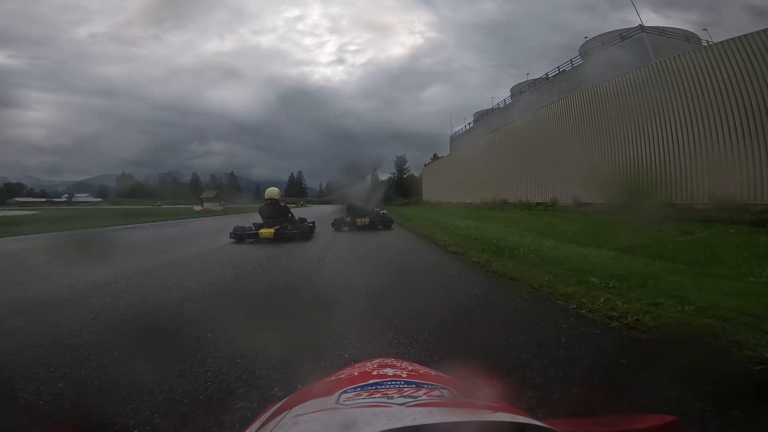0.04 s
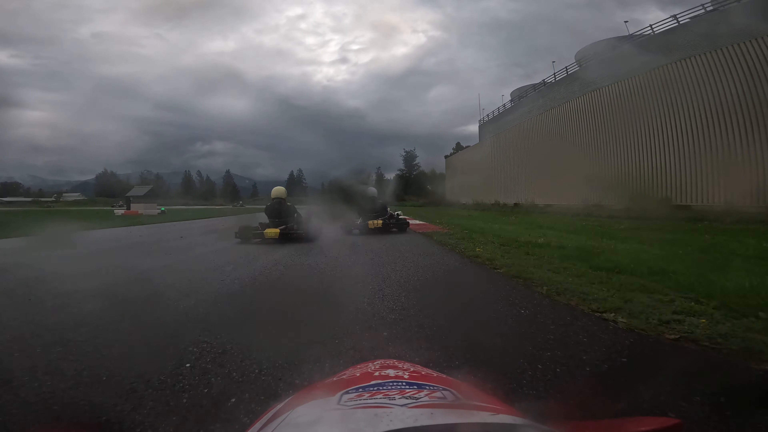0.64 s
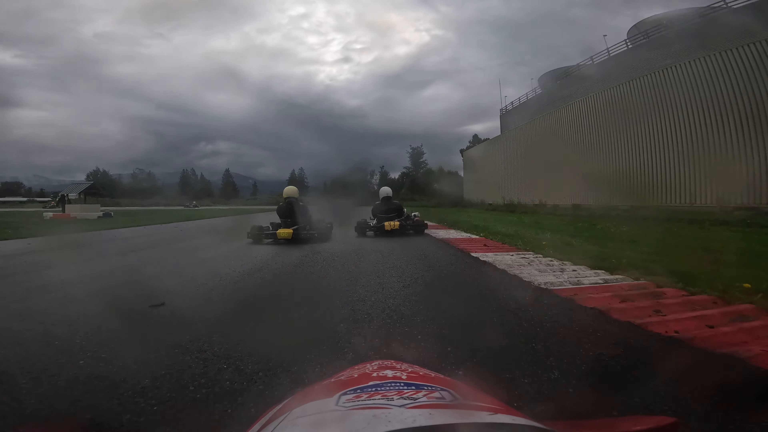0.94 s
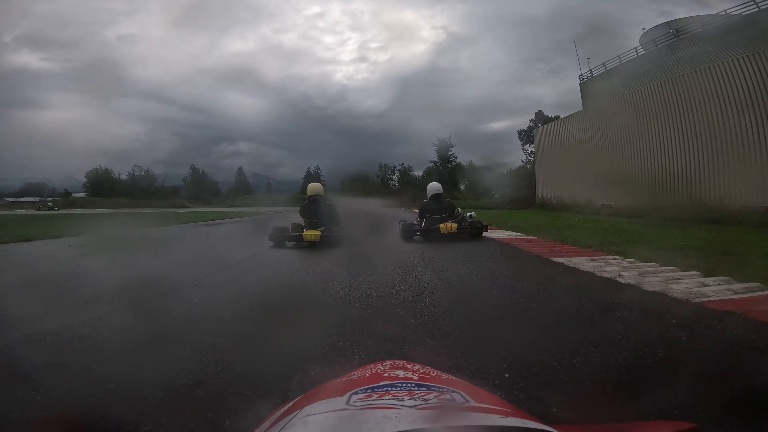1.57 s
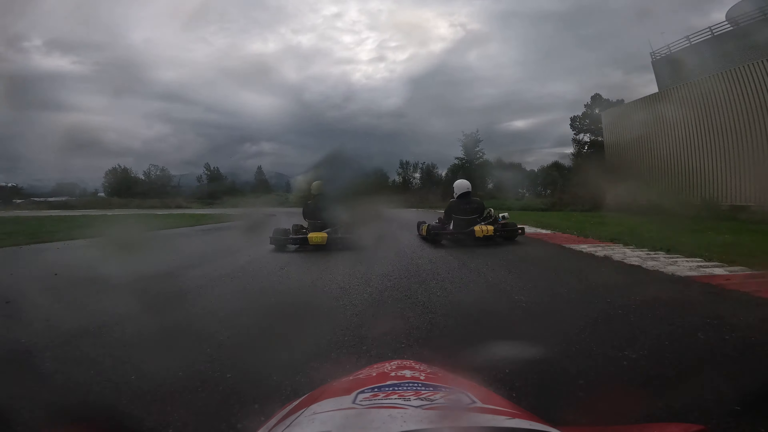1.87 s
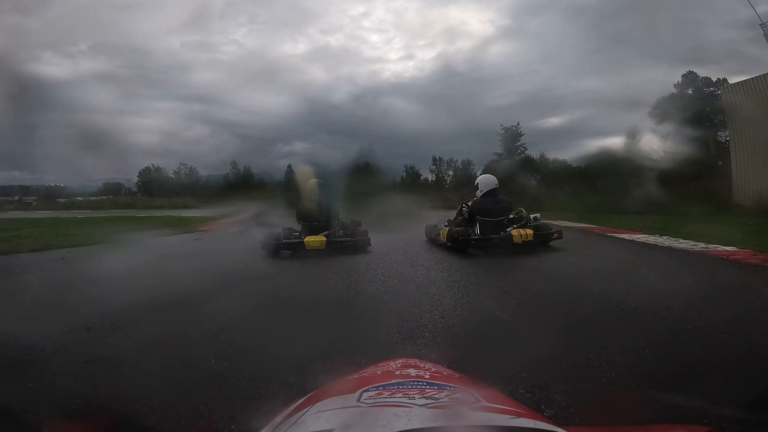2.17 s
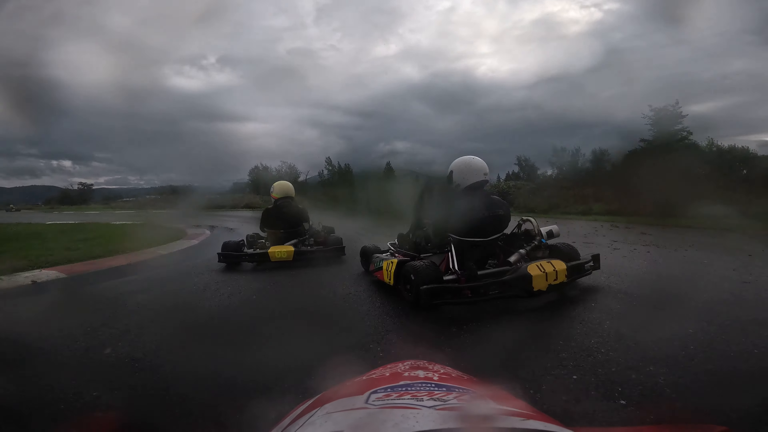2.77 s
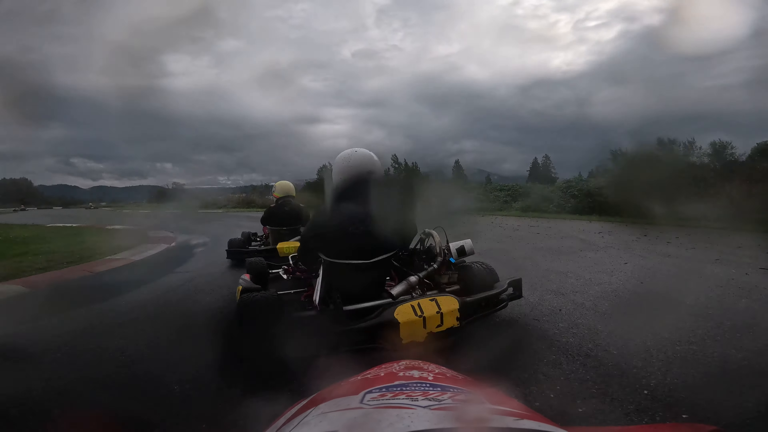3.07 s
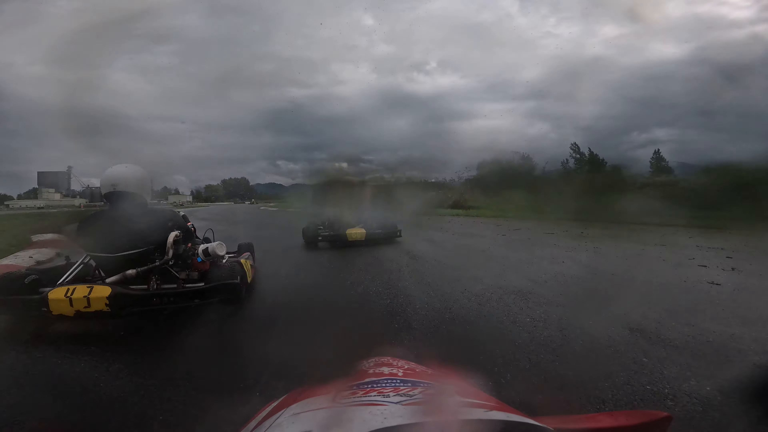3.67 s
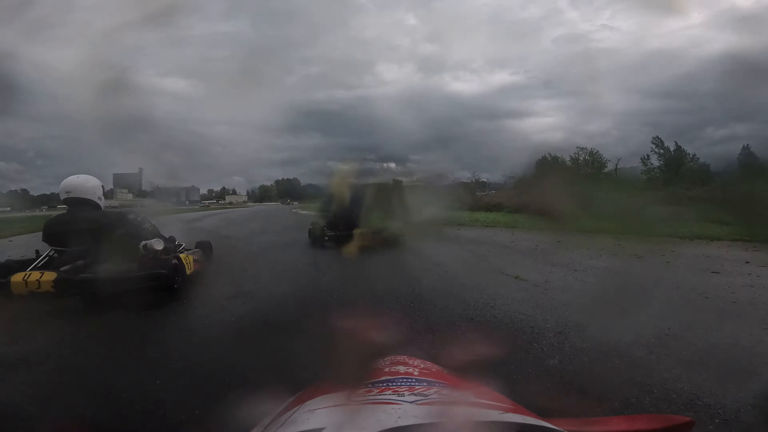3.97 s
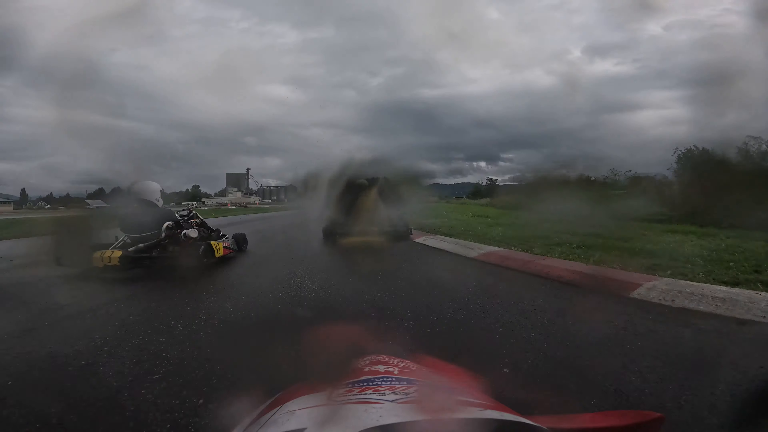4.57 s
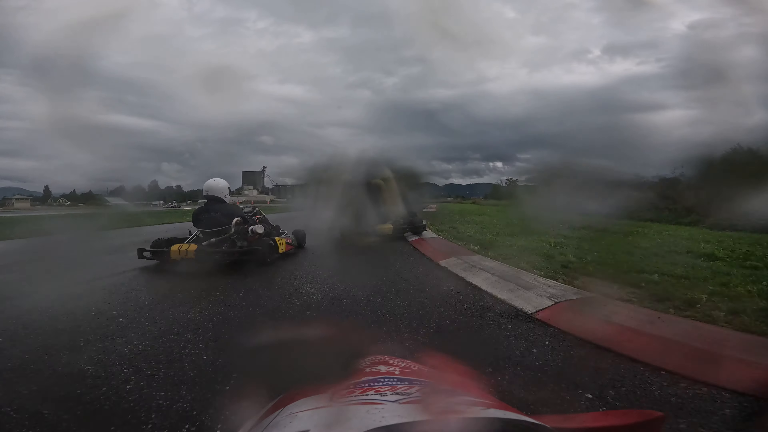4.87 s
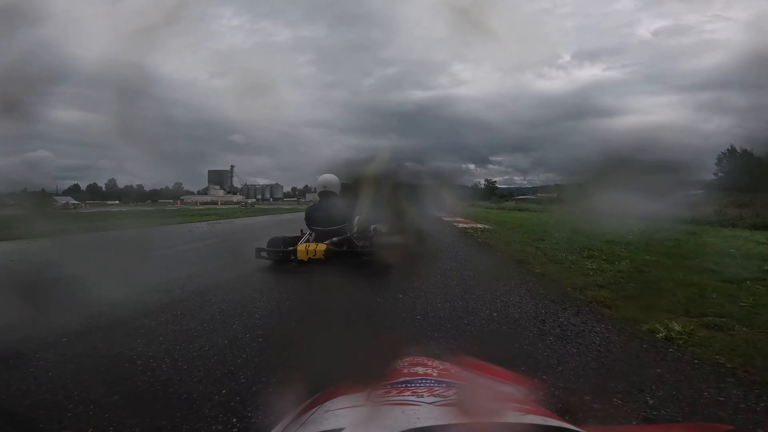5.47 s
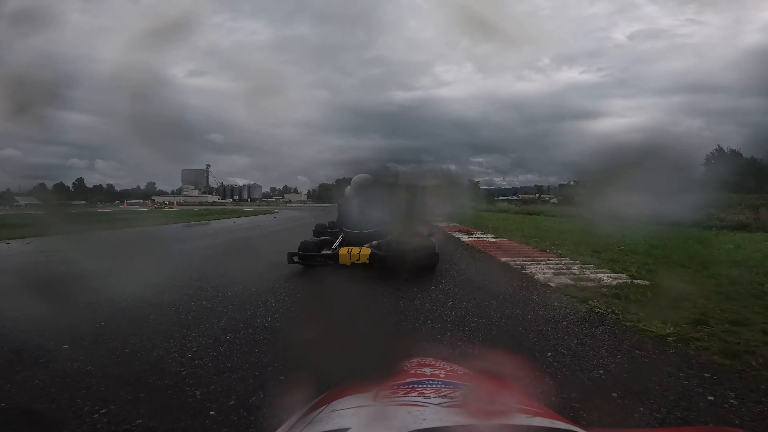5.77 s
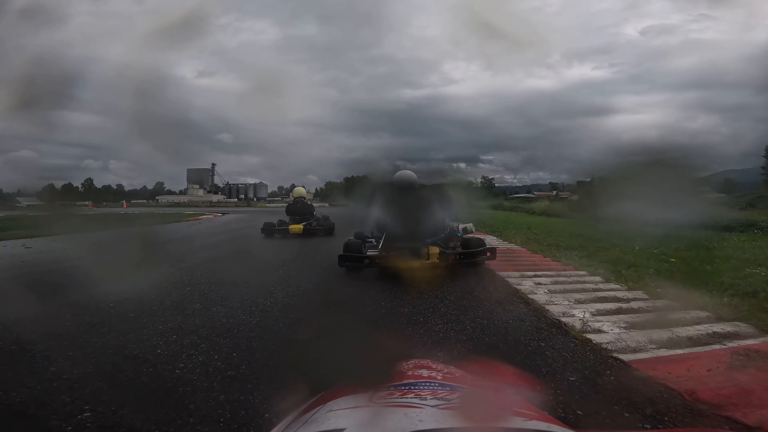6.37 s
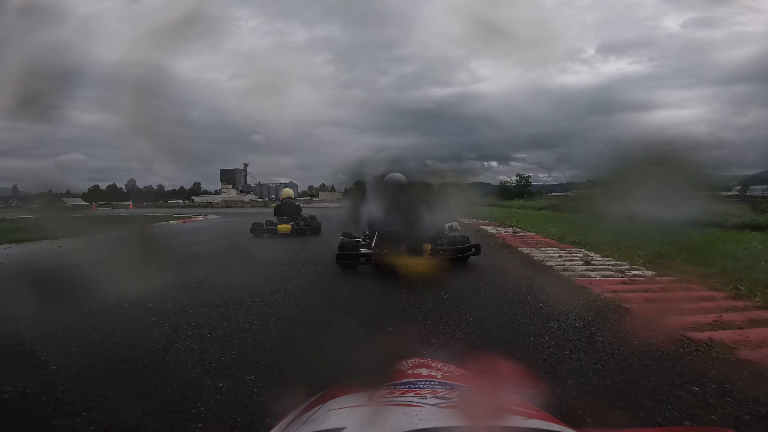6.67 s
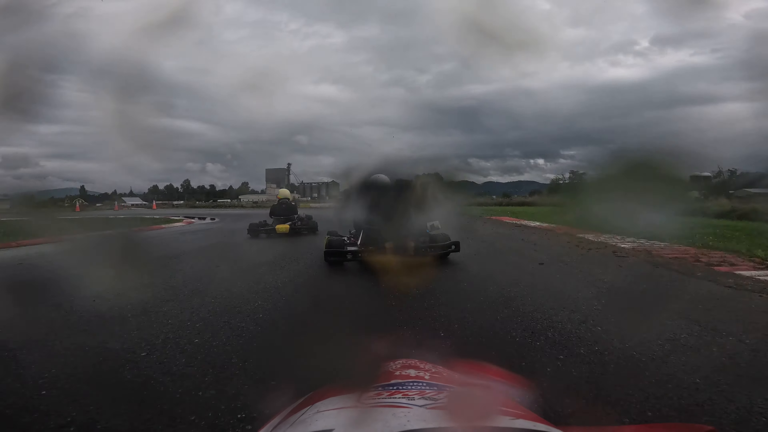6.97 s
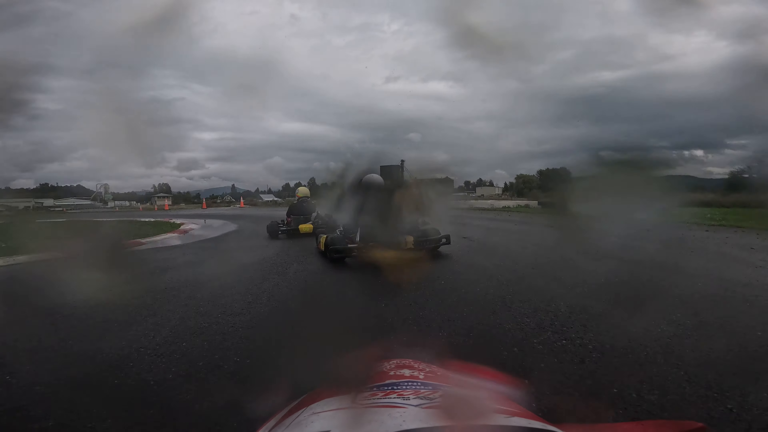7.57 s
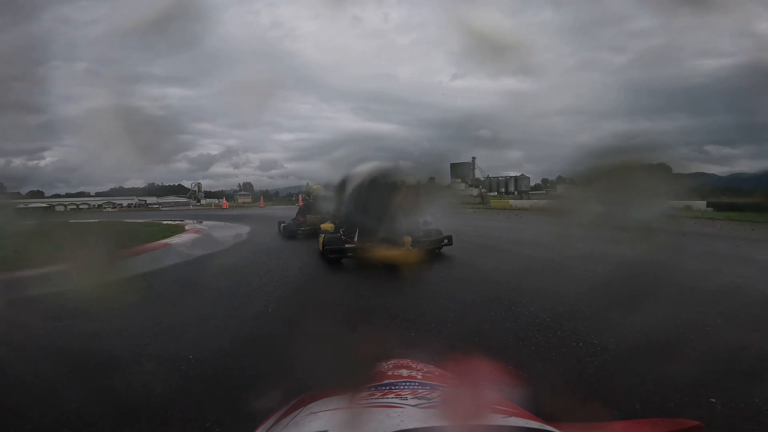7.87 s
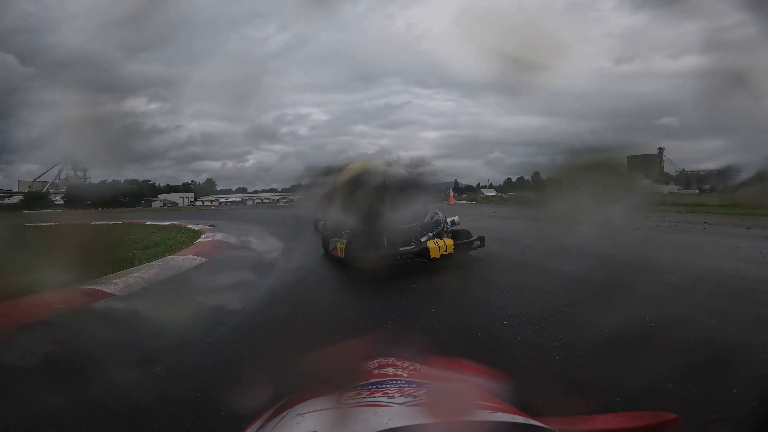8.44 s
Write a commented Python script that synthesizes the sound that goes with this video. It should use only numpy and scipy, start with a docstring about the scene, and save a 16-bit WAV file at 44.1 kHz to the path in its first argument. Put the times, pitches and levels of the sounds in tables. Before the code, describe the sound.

A single-cylinder kart engine drones loudly, heard from a microphone on the kart's own bodywork on a wet track. It starts at high revs with panels chattering, then sinks to a lower hum and growl for a corner, where another kart putters faintly. It pulls again with rapid plastic knocking, lifts off abruptly, slows, and picks up with more rattling near the end. Deep air rumble runs underneath.

```python
"""A single-cylinder four-stroke kart engine on a wet track, heard from a camera on the kart's bodywork.
Harmonics of the firing rate force the frame into a drone; under load each firing makes the panels
chatter, and off the throttle the crank orders hum. Loose panels knock and the chassis modes growl.
Air rumbles, the wheels thump and scrub in corners, spray hisses, a few drops strike the housing,
and the exhaust of the kart ahead putters whenever it comes close."""
import sys
import numpy as np
from scipy import signal
from scipy.fft import rfft, irfft, next_fast_len
from scipy.io import wavfile
from scipy.ndimage import uniform_filter1d, minimum_filter1d

SR = 44100
rng = np.random.default_rng(int(sys.argv[2]) if len(sys.argv) > 2 else 0)


def bounce(signal):
    """Save signal as a 16-bit WAV file at the path given by the first command-line argument."""
    frames = np.transpose(np.atleast_2d(signal))
    limited = np.clip(frames, -1, 1)
    pcm = np.round(limited * 32767).astype(np.int16)
    wavfile.write(sys.argv[1], SR, pcm)


N = 433944
T = np.arange(N) / SR

# engine speed: time_s, firing_hz
ENGINE_SPEED = [(0.0, 49.99), (0.45, 51.419), (0.96, 48.349), (2.06, 39.546), (2.79, 31.63), (3.11, 30.775),
                (3.7, 31.974), (4.05, 31.178), (4.46, 32.907), (4.77, 33.049), (4.82, 33.845),
                (5.99, 37.382), (6.01, 37.467), (7.28, 32.668), (8.51, 28.854), (8.76, 29.695),
                (9.26, 29.405), (9.84, 30.968)]


def drone(cycles, firing_hz, throttle):
    """Forced vibration: each harmonic of the firing rate swells as it crosses a frame resonance."""
    # harmonics: order, coasting_db, part_throttle_db, full_throttle_db
    orders = [(1, -41.5, -26, -16.5), (2, -11.5, -27.5, -40.5), (3, -48, -33.5, -28.5),
              (4, -20.5, -17.5, -31), (5, -47, -23, -26.5), (6, -24, -35.5, -42.5), (8, -29.5, -36.5, -41)]
    # response of the frame: frequency_hz, gain_db
    frame = [(30, 5), (50, 14.5), (60, 3), (72, -11), (85, 8.5), (102, 0), (125, 2), (150, 2), (165, -8.5),
             (190, 0), (222, -31.5), (262, -22.5), (294, 0), (420, -10.5)]
    # swell of the two main crank orders: time_s, second_order_db, fourth_order_db
    hum = [(.45, -6, 0), (.7, 2.5, -5), (1.051, 3.5, -4.5), (1.35, 2, 2.5), (1.75, -0.5, -9), (2.1, 3, 5),
           (2.5, 4.5, 0.5), (3.2, -1.5, 1.5), (4.502, 5.5, 1), (4.849, -6, 2.5), (5.75, 7, 3.5),
           (6.179, -15, -8), (6.45, 3, 2), (7.601, -2, 0.5), (8.3, 2.5, -6.5), (9.84, 2.5, -7)]
    frame_hz, frame_db = np.transpose(frame)
    hum_db = dict(zip((2, 4), curves(hum)))
    out = 0
    for order, *levels_db in orders:
        k = round(order)
        drive_db = np.interp(throttle, [0, .64, 1], levels_db) + hum_db.get(k, 0)
        response_db = np.interp(np.log(k * firing_hz), np.log(frame_hz), frame_db)
        bumps_db = 1.2 * walk(14)
        dispersion = np.pi * (k - 1) ** 2 / 5 + .7 * k  # bending waves give each order its own lag
        phase = 2 * np.pi * k * cycles - dispersion + .03 * k * walk(12)
        out += undb(drive_db + response_db + bumps_db) * np.cos(phase)
    return np.sqrt(2) * out


def mechanism(cycles, share):
    """Cyclic noise of valve gear, chain and gas: a share of the power repeats each engine cycle."""
    pattern = unit(irfft(np.exp(2j * np.pi * rng.random(513))))
    cyclic = np.interp(cycles % 1, np.linspace(0, 1, len(pattern)), pattern)
    return np.sqrt(share) * cyclic + np.sqrt(1 - share) * rng.standard_normal(N)


def crank_pulses(cycles, width_turns, scatter_db, idle_db):
    """Four-stroke excitation: one uneven pulse per crank turn, weaker on the turn that does not fire."""
    crank = 2 * cycles
    turn = np.maximum(np.round(crank).astype(int), 0)
    size = undb(scatter_db * rng.uniform(-1, 1, 2048)[turn] + idle_db * (turn % 2))
    return size * np.exp(-np.abs(crank - turn) / width_turns)


def firing_bursts(cycles, firing_hz, throttle):
    """Modulation envelope: pulses grow with load, and at high revs the panels no longer settle."""
    rattle = np.clip((firing_hz - 43.3) / 25.2, 0, 1)
    load = np.clip((throttle - .36) / .54, rattle, 1)
    pulses = crank_pulses(cycles, width_turns=.19, scatter_db=4.5, idle_db=-14.5)
    return load * ((1 - rattle) * pulses + rattle / 2)


def engine_noise(cycles, bursts, throttle):
    """Amplitude modulation: the firings pulse a low boom and a midrange clatter of machine noise."""
    # spectrum of the boom: frequency_hz, level_db
    boom_spectrum = [(130, -38), (205, -5.5), (245, -3.5), (295, 1.5), (400, -2), (490, -10.5), (620, -17),
                     (3000, -88.5)]
    # spectrum of the clatter: frequency_hz, level_db
    clatter_spectrum = [(250, -26), (470, 3.5), (640, -1), (820, 2), (910, 4.5), (985, 3), (1060, -4),
                        (1170, -0.5), (1320, -17.5), (1800, -14.5), (2300, -32.5), (8000, -79.5)]
    boom = unit(colour(mechanism(cycles, share=.14) * (1 + 2.1 * bursts), boom_spectrum))
    boom *= ride(throttle, base_db=-25, per_shake=1.72, db_per_hz=.4732, full_db=-1.5, corner_db=3.5)
    clatter = unit(colour(mechanism(cycles, share=.18) * (1 + 3.97 * bursts), clatter_spectrum))
    clatter *= ride(throttle, base_db=-29, per_shake=1.28, db_per_hz=.4127, full_db=-1.6, corner_db=1)
    return boom + clatter


def intake(throttle):
    """Resonance of the intake: a band of noise that roars at high revs."""
    gain = ride(throttle, base_db=-45, per_shake=2.4, db_per_hz=1.19, full_db=.5, corner_db=-5)
    return gain * noise_band(hz=552, width_hz=260)


def chassis_growl(cycles, firing_hz):
    """Modal response: crank turns ring the chassis, beside a wavering 11th order, clearer at speed."""
    # chassis modes: frequency_hz, width_hz, gain_db
    modes = [(280, 35, 8.5), (362, 44, -7), (985, 46, 2), (1730, 220, -26)]
    # strength of the growl: time_s, level_db
    strength = [(1.9, -54), (2.15, -34), (2.6, -35), (3.17, -28), (3.6, -42.5), (6.6, -55), (7.05, -35.5),
                (7.4, -37.5), (7.7, -32.5), (8.35, -28.5), (8.9, -31.5), (9.84, -34.5)]
    judder = mechanism(cycles, share=.27)
    judder *= .5 + 1.7 * crank_pulses(cycles, width_turns=.35, scatter_db=8, idle_db=-5.5)
    ringing = signal.sosfilt(signal.butter(6, 2200, fs=SR, output="sos"), ring(judder, modes))
    tone_db = 5 + .42 * (firing_hz - firing_hz.mean()) + 3 * walk(20)
    tone = undb(tone_db) * np.cos(2 * np.pi * 11 * cycles + .7 * walk(18))
    return undb(curves(strength)[0]) * (unit(ringing) + tone)


def bodywork(force, knocked):
    """Modal superposition: neighbouring modes swing opposite ways and the plastic absorbs the treble."""
    # panel modes: frequency_hz, width_hz, knocked_db, buzzing_db
    modes = [(550, 780, 9, -8.5), (787, 280, 17.5, 8.5), (920, 200, 11.5, 2), (1160, 66, 9, 6.5),
             (1404, 91, 10, 8), (1746, 336, 2.5, 5), (2110, 180, -7, -8)]
    out = 0
    for k, (hz, width_hz, knocked_db, buzzing_db) in enumerate(modes):
        out += (-1) ** k * ring(force, [(hz, width_hz, knocked_db if knocked else buzzing_db)])
    return signal.sosfilt(signal.butter(2, 2600, fs=SR, output="sos"), out)


def panel_buzz(cycles, bursts):
    """Forced rattling: bursts of machine noise drive the modes of the loose bodywork."""
    # how freely the panels buzz: time_s, level_db
    looseness = [(0, -34), (.75, -36), (1.15, -38), (1.6, -29), (1.95, -38.5), (3.4, -45.5), (3.5, -41),
                 (4.1, -39.5), (5.5, -35.5), (6.15, -35.5), (6.21, -41.5), (8.4, -51.5), (8.8, -33.5),
                 (9.84, -41)]
    force = mechanism(cycles, share=.071) * (1 + 7.7 * bursts)
    return undb(curves(looseness)[0]) * unit(bodywork(force, knocked=False))


def panel_knocks(squeak_hz, clack_hz):
    """Friction and impact: a panel squeaks on its mount, cracks loose, lands with a crack and a clack."""
    # knocks against the mounts: time_s, landing_db, sliding_db
    knocks = [(0.013, -14.5, -18.5), (0.054, -17.0, -16.5), (0.093, -18.0, -24.0), (0.182, -15.0, -23.0),
              (0.222, -13.0, -21.0), (0.32, -13.0, -23.5), (0.456, -14.0, -16.5), (0.495, -13.5, -20.0),
              (0.573, -17.5, -23.0), (0.613, -15.0, -31.0), (0.714, -12.0, -18.5), (0.734, -13.0, -25.0),
              (0.837, -15.5, -25.0), (1.388, -16.0, -24.5), (1.556, -14.0, -25.0), (1.591, -13.0, -24.0),
              (1.638, -12.5, -17.5), (1.675, -13.5, -25.0), (1.803, -14.0, -26.5), (3.48, -17.5, -17.0),
              (3.514, -9.5, -13.0), (3.547, -11.5, -17.0), (3.607, -15.0, -22.0), (3.641, -12.5, -12.5),
              (3.672, -13.0, -25.0), (3.704, -8.5, -25.5), (3.734, -12.5, -21.5), (3.797, -11.0, -18.5),
              (3.83, -12.0, -24.0), (3.923, -14.0, -22.5), (3.953, -9.0, -14.0), (3.987, -10.5, -23.0),
              (4.018, -10.0, -15.0), (4.052, -9.5, -15.0), (4.148, -15.0, -23.5), (4.178, -14.5, -23.5),
              (4.211, -10.5, -18.0), (4.242, -13.5, -24.5), (4.274, -13.5, -19.5), (4.334, -8.5, -16.0),
              (4.399, -12.5, -29.5), (4.576, -15.5, -23.0), (4.757, -10.5, -17.0), (4.788, -9.0, -17.0),
              (4.831, -13.0, -18.0), (4.848, -11.5, -19.5), (4.877, -17.0, -21.5), (4.907, -13.5, -18.0),
              (4.939, -13.5, -21.5), (4.967, -9.0, -16.5), (4.998, -14.5, -23.0), (5.142, -13.5, -29.0),
              (5.3, -12.5, -26.0), (5.371, -13.5, -18.0), (5.621, -10.0, -20.0), (5.891, -9.5, -18.0),
              (5.919, -14.5, -29.0), (5.943, -12.0, -17.0), (5.973, -7.5, -18.0), (5.999, -12.0, -15.0),
              (6.053, -8.5, -16.5), (6.105, -9.0, -21.5), (6.155, -11.0, -24.0), (8.583, -13.5, -25.0),
              (8.62, -11.5, -24.0), (8.722, -13.0, -19.0), (8.891, -8.5, -15.0), (8.926, -9.0, -13.5),
              (9.024, -20.0, -18.0), (9.06, -7.5, -20.5), (9.094, -9.5, -18.5), (9.128, -10.5, -16.0),
              (9.229, -13.5, -19.5), (9.264, -11.5, -14.5), (9.297, -11.5, -17.0), (9.366, -13.5, -24.5),
              (9.399, -9.5, -17.0), (9.433, -9.0, -14.5), (9.466, -13.5, -16.0), (9.5, -8.5, -19.0),
              (9.534, -10.5, -18.0), (9.566, -8.5, -13.0), (9.598, -10.0, -17.5), (9.633, -9.5, -20.0),
              (9.665, -8.0, -19.5), (9.698, -10.5, -24.5), (9.73, -11.5, -18.0), (9.762, -15.5, -17.5),
              (9.796, -13.0, -21.0), (9.827, -9.5, -23.5)]
    # spectrum of the contacts: frequency_hz, level_db
    crack_spectrum = [(300, -13), (2000, 12.5), (2500, -6.5), (3300, -9), (4000, -16), (5000, -25),
                      (7500, -49.5), (16000, -64.5)]
    # where the panel cancels itself: frequency_hz, width_hz
    antiresonances = [(625, 150), (1290, 37), (1530, 43), (2330, 150)]
    out, chatter, crack = np.zeros((3, N))
    wander, grip = 1 + .03 * walk(700), undb(2.2 * walk(600))  # friction roughens the squeak
    for time_s, landing_db, sliding_db in knocks:
        rise_scatter, pitch_scatter, crack_scatter = rng.standard_normal(3)
        near = slice(max(int((time_s - .04) * SR), 0), int((time_s + .04) * SR))
        lag = T[near] - time_s
        hz = squeak_hz * wander[near] * (1 - .08 * swell(lag, .001, .001))
        slide = .8 * swell(lag + .0012, .002 * undb(1.5 * rise_scatter), .0016)
        slide += .45 * swell(lag, .013, .011)
        squeak = slide * grip[near] * np.sin(2 * np.pi * np.cumsum(hz) / SR)
        clack_phase = 2 * np.pi * clack_hz * (1 + .04 * pitch_scatter) * lag
        clack = swell(lag - .0001, .0014, .0014) * np.sin(clack_phase)
        out[near] += undb(sliding_db - 3) * squeak + undb(landing_db + 2.5) * clack
        chatter[near] += undb(landing_db - 2.5) * swell(lag + .0008, .0055, .0038)
        contacts = swell(lag + .0013, .001, .0008) + .8 * swell(lag - .0009, .0008, .0008)
        crack[near] += undb((landing_db + 2 * sliding_db) / 3 + 1.5 * crack_scatter) * contacts
    out += bodywork(chatter * rng.standard_normal(N), knocked=True)
    out += undb(1.5) * colour(crack * rng.standard_normal(N), crack_spectrum)
    for hz, width_hz in antiresonances:
        out = signal.lfilter(*signal.iirnotch(hz, hz / width_hz, SR), out)
    return out


def scrape():
    """Friction noise: one brief metallic scrape at the start."""
    return undb(-33) * swell(T - .047, rise_s=.03, fall_s=.014) * noise_band(hz=2700, width_hz=810)


def air_rumble(throttle):
    """Flow noise: the passing air rumbles, mostly in the deep bass."""
    # spectrum of the air: frequency_hz, level_db
    spectrum = [(15, -10), (25, -2), (45, 10.5), (62, 0), (85, -9.5), (110, 0), (150, -4), (215, -17.5),
                (1000, -100)]
    gain = ride(throttle, base_db=-20.5, per_shake=1, db_per_hz=.12, full_db=3, corner_db=1.5)
    return gain * unit(colour(rng.standard_normal(N), spectrum))


def wheel_thump(cycles):
    """Periodic forcing: out-of-round tyres thump at multiples of the axle rate, slipping on the wet."""
    # axle harmonics: order, level_db
    harmonics = [(1, -28), (2, -24)]
    axle_turns = .55 * cycles + .15 * walk(4)
    return np.sqrt(2) * sum(undb(db + 2 * walk(1.8)) * np.cos(2 * np.pi * round(k) * axle_turns)
                            for k, db in harmonics)


def tyres(bursts, throttle):
    """Rolling and sliding contact: the tyres hiss, and their walls resonate as they scrub in corners."""
    # spectrum of the hiss: frequency_hz, level_db
    spectrum = [(1500, -18.5), (2400, 5.5), (2800, 1.5), (3200, 6.5), (4100, 4), (4900, -6.5), (5800, -7),
                (7000, -33.5), (12000, -51)]
    hiss = undb(walk(25)) * unit(colour(rng.standard_normal(N) * (1 + .55 * bursts), spectrum))
    hiss *= ride(throttle, base_db=-58.5, per_shake=.52, db_per_hz=0, full_db=4, corner_db=1)
    scrub = noise_band(hz=148, width_hz=33)
    scrub *= ride(throttle, base_db=-31.5, per_shake=.3, db_per_hz=-.02, full_db=1, corner_db=11)
    return hiss + scrub


def kart_ahead(firing_hz, puff_at_s):
    """Pulsed gas flow: one soft puff per firing over a steady hiss, ringing the silencer."""
    # loudness as it nears and recedes: time_s, level_db
    nearness = [(2.7, -45.5), (2.98, -37.5), (3.16, -33.5), (3.28, -35.5), (3.7, -42), (4.6, -77.5),
                (7.4, -64), (7.75, -42), (8.05, -50), (8.35, -39.5), (9.8, -55)]
    # spectrum of the exhaust: frequency_hz, level_db
    spectrum = [(300, 20.5), (1750, 11.5), (2300, 0.5), (4100, 1), (4900, -10.5), (5800, -15.5),
                (6600, -16.5), (8000, -13.5), (12000, -52)]
    # silencer modes: frequency_hz, width_hz, gain_db
    silencer = [(1710, 130, -2), (5570, 700, 3)]
    cycles = np.cumsum(firing_hz + .15 * walk(2)) / SR
    cycles = cycles - np.interp(puff_at_s, T, cycles) + .5
    puffs = (.16 + swell(cycles % 1 - .5, .11, .14)) * undb(walk(40))  # swell timed in cycles
    gas = colour(puffs * rng.standard_normal(N), spectrum)
    return undb(curves(nearness)[0]) * unit(gas + ring(gas, silencer))


def drops():
    """Liquid impact: a drop ticks on the housing, bursts into a fizz and leaves a tail of droplets."""
    # drops on the housing: time_s, level_db
    hits = [(1.907, -28), (2.3, -46.5), (2.543, -40), (6.326, -44.5)]
    # spectrum of a splash: frequency_hz, level_db
    spectrum = [(500, -43), (1800, 25), (3000, 3), (9800, 1), (11000, -7.5), (14000, 0.5), (15200, -10.5)]
    ticks, splash = np.zeros((2, N))
    for time_s, level_db in hits:
        lag = T - time_s
        ticks[int(time_s * SR)] += undb(level_db)
        splash += undb(level_db) * (swell(lag, .0007, .0014) + undb(-16) * swell(lag, .004, .014))
    return colour(ticks + undb(-1) * splash * rng.standard_normal(N), spectrum)


def spray():
    """Random superposition: a dense patter of fine droplets merges into a hiss."""
    # spray thrown at the camera: time_s, level_db
    wetness = [(0, -73.5), (1, -76), (1.4, -68), (2.2, -62), (3.5, -66), (5.4, -71.5), (7.1, -74.5),
               (7.75, -68.5), (9.84, -68)]
    # spectrum of the spray: frequency_hz, level_db
    spectrum = [(3000, -2.5), (5700, 1.5), (6700, 1.5), (8000, -0.5), (9900, -3), (11000, -11), (12200, -6),
                (13500, -12), (15500, -20.5)]
    patter = rng.standard_normal(N) * undb(2 * rng.exponential(size=N))
    return undb(curves(wetness)[0] + 2 * walk(12)) * unit(colour(patter, spectrum))


def ride(throttle, base_db, per_shake, db_per_hz, full_db, corner_db):
    """Gain of a noise: the effects of shake, engine speed, throttle and cornering add in decibels."""
    # how hard the track shakes the chassis: time_s, level_db
    shake = [(0.0, -26), (0.52, -31), (0.6, -29), (1.67, -25), (1.92, -28.5), (2.9, -24), (4.79, -24.5),
             (4.9, -21.5), (5.1, -24), (5.78, -21), (6.38, -30), (7.04, -25.5), (8.66, -23.5), (9.84, -27)]
    # corners of the track: start_s, end_s
    corners = [(2.15, 3.6), (7.0, 11)]
    shake_db, firing_hz = curves(shake)[0], curves(ENGINE_SPEED)[0]
    ease_s = .72
    cornering = sum(np.clip(np.minimum(T - start, end - T) / ease_s + .5, 0, 1) for start, end in corners)
    motion_db = per_shake * (shake_db - shake_db.mean()) + db_per_hz * (firing_hz - firing_hz.mean())
    return undb(base_db + motion_db + full_db * throttle + corner_db * cornering)


def ring(x, modes):
    """Parallel resonators, each given as frequency_hz, width_hz, gain_db."""
    return sum(undb(db) * signal.lfilter(*signal.iirpeak(hz, hz / width, SR), x)
               for hz, width, db in modes)


def noise_band(hz, width_hz):
    """Narrowband noise: two passes through one resonance, rms 1."""
    mode = [(hz, width_hz, 0)]
    return unit(ring(ring(rng.standard_normal(N), mode), mode))


def colour(x, spectrum):
    """Minimum-phase filter with the outline frequency_hz, level_db."""
    hz, db = np.transpose(spectrum)
    size = 2 * next_fast_len(N // 2 + SR // 4)
    bins_hz = np.maximum(np.arange(size // 2 + 1) * SR / size, 1)
    gain = undb(np.interp(np.log(bins_hz), np.log(hz), db))
    cepstrum = irfft(np.log(gain))
    cepstrum[1:size // 2] *= 2  # folding the cepstrum makes the filter causal
    cepstrum[size // 2 + 1:] = 0
    return irfft(rfft(x, size) * np.exp(rfft(cepstrum)))[:N]


def swell(lag, rise_s, fall_s):
    """Exponential growth up to lag 0 and decay after it."""
    return np.exp(np.where(lag < 0, lag / rise_s, -lag / fall_s))


def walk(rate_hz):
    """Smooth random fluctuation, rms 1, changing about rate_hz times a second."""
    jagged = np.interp(T * rate_hz, np.arange(4096), rng.standard_normal(4096))
    return unit(uniform_filter1d(jagged, max(int(SR / rate_hz / 2), 1)))


def curves(table):
    """Linear interpolation of each column over time."""
    time_s, *columns = np.transpose(table)
    return [np.interp(T, time_s, column) for column in columns]


def undb(db):
    """Decibels to amplitude gain."""
    return 10 ** (np.asarray(db) / 20)


def unit(x):
    """Scale to rms 1."""
    return x / np.sqrt(np.mean(x ** 2))


def scene():
    """Superposition: engine speed times the kart's vibration and the throttle sets the firings' force."""
    # the driver's foot: time_s, throttle_fraction
    pedal = [(0, 0.81), (.47, 0.76), (.55, 0.2), (1.4, 0.47), (2.2, 0.36), (3.4, 0.2), (3.49, 0.84),
             (4.65, 0.9), (4.9, 0.72), (5.6, 0.7), (5.9, 0.7), (6.14, 0.95), (6.19, 0), (8.25, 0.22),
             (8.6, 0.6), (9.84, 1)]
    throttle = np.clip(curves(pedal)[0], 0, 1)
    firing_hz = curves(ENGINE_SPEED)[0]
    cycles = -.158 + np.cumsum(firing_hz) / SR  # one cycle is one firing, two crank turns
    bursts = firing_bursts(cycles, firing_hz, throttle)
    engine = drone(cycles, firing_hz, throttle) + engine_noise(cycles, bursts, throttle) + intake(throttle)
    chassis = chassis_growl(cycles, firing_hz) + scrape()
    panels = panel_buzz(cycles, bursts) + panel_knocks(squeak_hz=1795, clack_hz=969)
    rolling = air_rumble(throttle) + wheel_thump(cycles) + tyres(bursts, throttle)
    background = kart_ahead(firing_hz=31.9, puff_at_s=3.142) + drops() + spray()
    return (engine + chassis + panels + rolling + background)[None]


def record(dry):
    """Limiting: the camera ducks swells of bass, rounds the highest peaks and cuts the top treble."""
    bass = uniform_filter1d(dry, SR // 400)
    hold = SR // 60
    allowed_gain = np.minimum(1, undb(-7.5) / (np.abs(bass) + 1e-9))
    limited = dry * undb(-.32) * uniform_filter1d(minimum_filter1d(allowed_gain, hold), hold)
    rounded = limited / (1 + np.abs(limited / .95) ** 8) ** (1 / 8)
    return signal.sosfilt(signal.ellip(8, .2, 70, 15800, fs=SR, output="sos"), rounded)


dry = scene()
out = record(dry)
bounce(out)
```